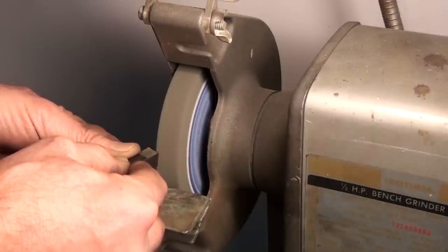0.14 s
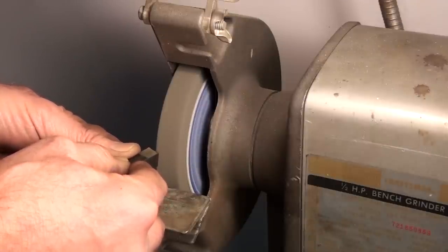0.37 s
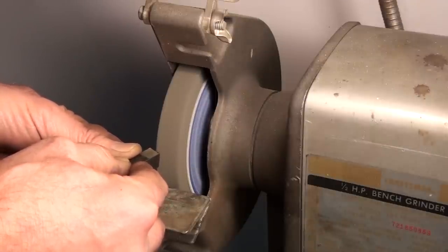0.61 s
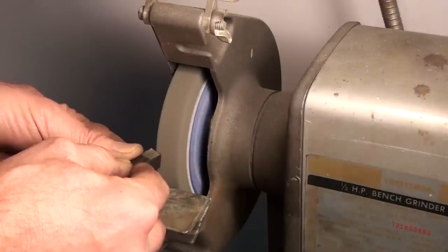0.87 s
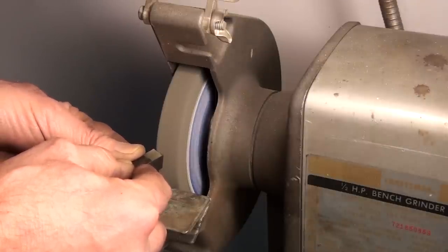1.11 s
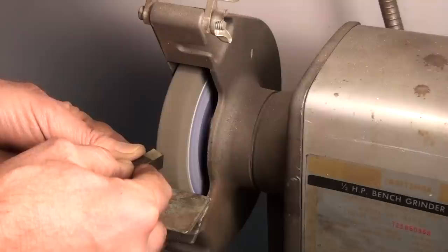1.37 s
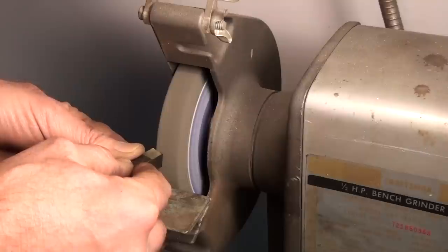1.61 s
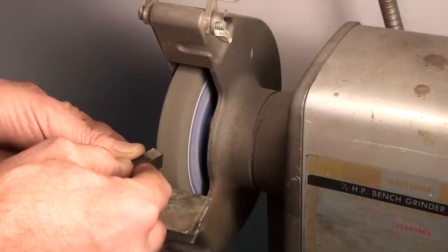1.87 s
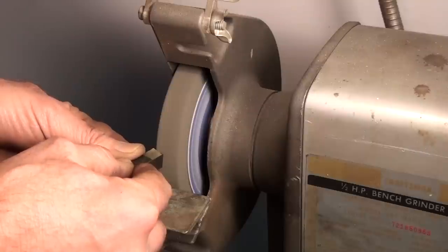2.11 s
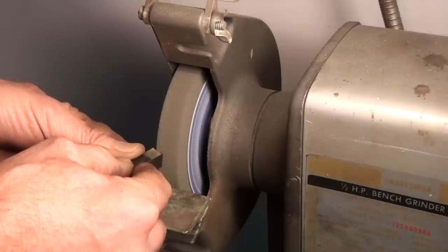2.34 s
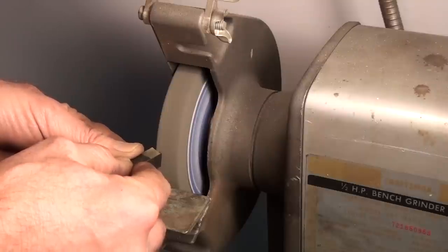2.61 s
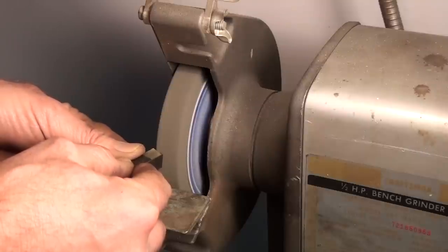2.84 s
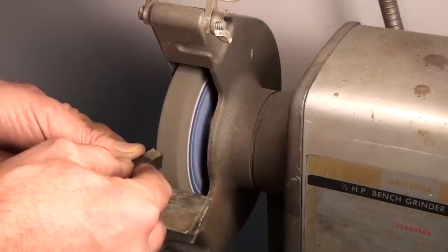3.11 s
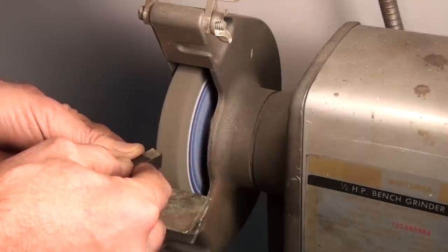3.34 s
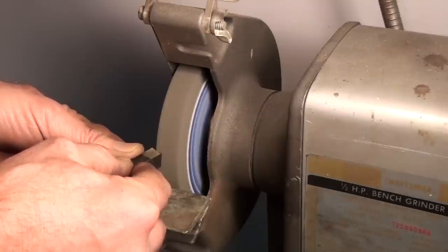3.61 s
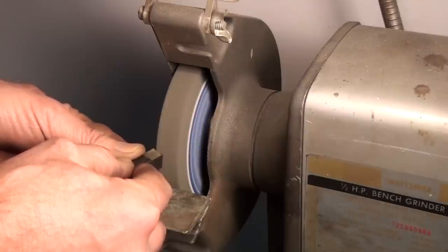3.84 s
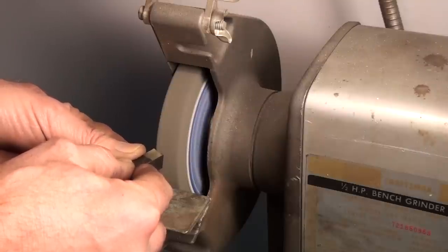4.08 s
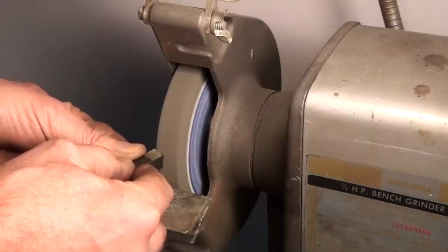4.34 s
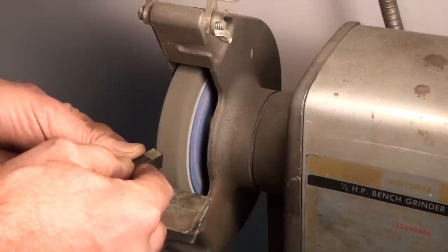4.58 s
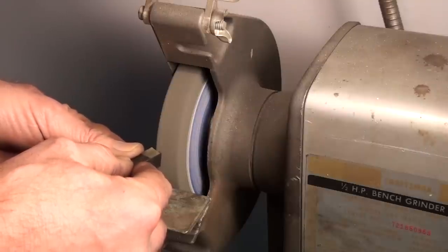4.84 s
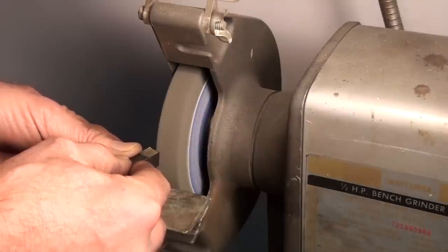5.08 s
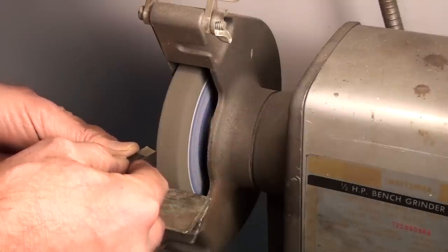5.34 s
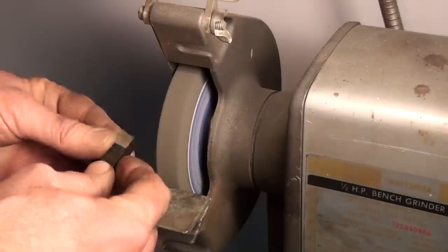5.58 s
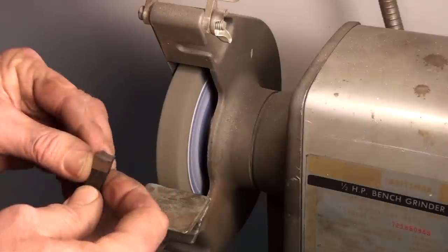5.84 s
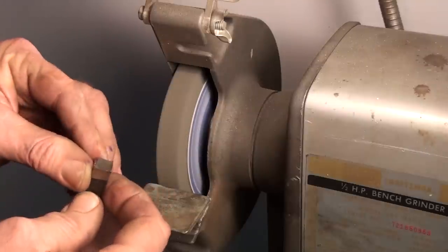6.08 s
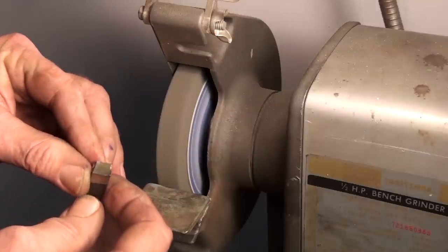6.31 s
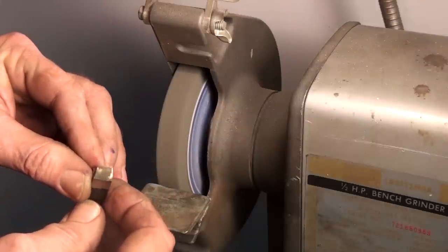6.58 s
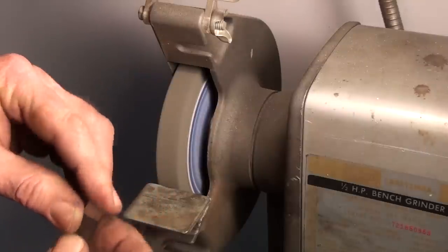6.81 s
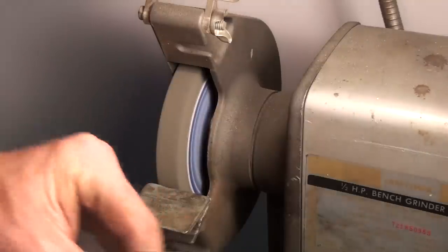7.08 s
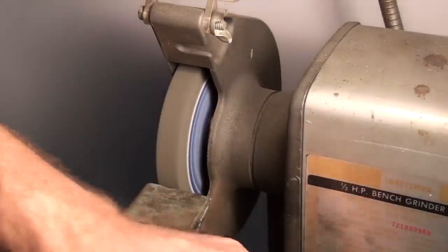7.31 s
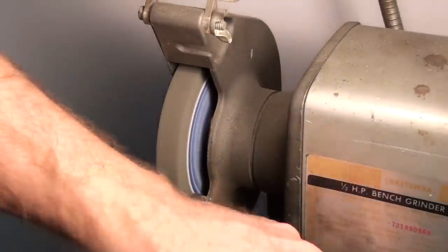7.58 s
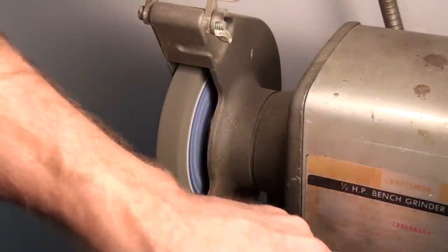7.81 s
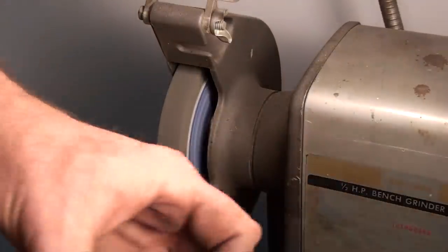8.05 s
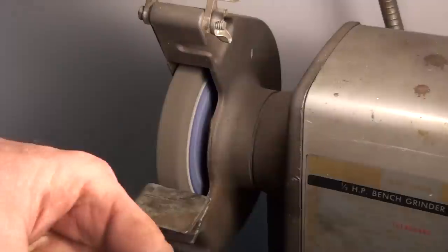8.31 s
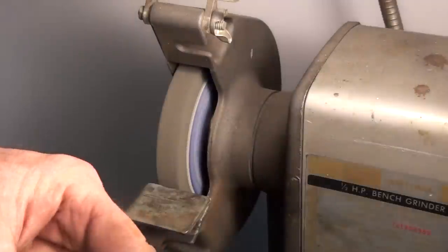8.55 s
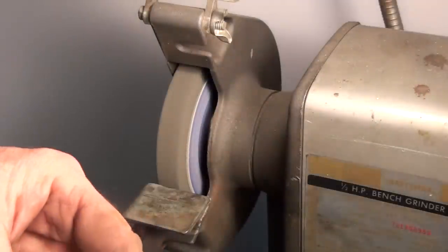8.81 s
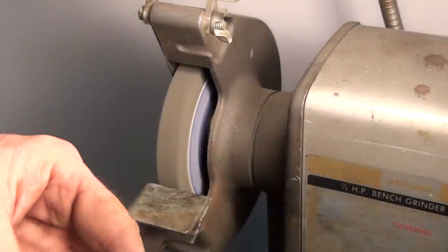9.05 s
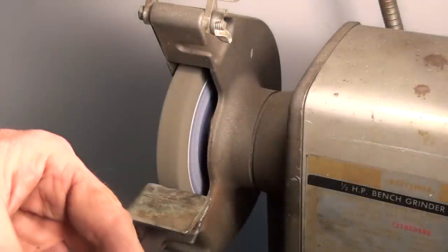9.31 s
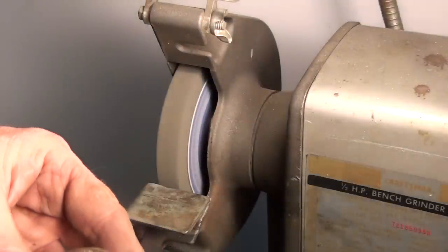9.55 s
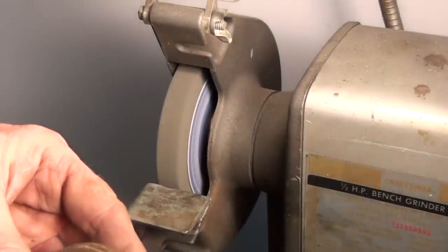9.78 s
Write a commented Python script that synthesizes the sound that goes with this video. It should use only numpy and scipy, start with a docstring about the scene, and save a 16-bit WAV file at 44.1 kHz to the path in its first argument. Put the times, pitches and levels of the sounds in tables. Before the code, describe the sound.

Scratchy, ringing metal grinding with spark hiss over a constant beating motor whine, then only the running machine remains in the workshop.

```python
"""In a workshop a bench grinder runs steadily: mains hum, the beating whine of two ball bearings, air roar.
A hand-held steel tool bit is pressed on the wheel in uneven strokes, then lifted away. Dense grain strikes
excite resonances of bit and tool rest, with spark hiss; sparse noise bursts are catching grains. The whine
is a sum of sines at ball-pass multiples, the roar is band-filtered noise; both follow the worker's pose,
and an arm reaching past the machine shades the whine."""
import sys
import numpy as np
from scipy import signal
from scipy.fft import rfft, irfft
from scipy.io import wavfile
from scipy.ndimage import uniform_filter1d

SR = 44100
rng = np.random.default_rng(int(sys.argv[2]) if len(sys.argv) > 2 else 0)


def master(y):
    """Save y as 16-bit WAV."""
    cut = np.clip(np.atleast_2d(y).T, -1, 1)
    pcm = np.round(cut * 32767)  # scale
    wavfile.write(sys.argv[1], SR, pcm.astype(np.int16))


def nominal_scale(level):
    """Amplitude ratio for a level in decibels (scalar or array-like)."""
    x = np.asarray(level, float) / 20
    return 10 ** x


N = 437472
SHAFT_HZ = 59.66

# Steady contact of tool and wheel: t/s, tool rest level/dB rms, mean spark hiss level/dB rms
CONTACT = [(0.0, -36, -31), (0.5, -35, -30), (0.78, -32, -35), (1.12, -55, -48), (1.45, -33, -41),
           (2.08, -34, -38), (2.3, -25, -40), (2.5, -24, -38), (2.86, -31, -37), (3.2, -27.5, -35),
           (3.5, -29, -37), (3.72, -32, -30), (3.95, -23, -35), (4.17, -32, -36), (4.68, -27, -37),
           (5.1, -31.5, -35), (5.4, -32, -27), (5.6, -48, -43), (5.83, -76, -71)]


def grinding(phase_per_hz):
    """Impact excitation: one train of grain strikes drives both the steel and the sparks."""
    rest_db, hiss_db = in_time(CONTACT)
    shank, tip, rest, biting = bites()
    grit = grain_strikes(phase_per_hz)
    hiss_swing = np.minimum(biting, 1) - 0.5
    return steel(grit, rest_db, shank, tip, rest) + sparks(grit, phase_per_hz, hiss_db, hiss_swing)


def grain_strikes(phase_per_hz):
    """Random impulse train, amplitude-modulated by wheel runout (once and twice a turn) and a shaky hand."""
    strikes_per_s = 6000
    runout = 1 + 0.18 * np.cos(SHAFT_HZ * phase_per_hz) + 0.23 * np.cos(2 * SHAFT_HZ * phase_per_hz)
    bite = nominal_scale(1.3 * drift(25.0)) * runout
    sizes = nominal_scale(5.0 * np.minimum(rng.exponential(1, (2, N)), 5))
    signs = rng.choice([-1, 1], (2, N))
    struck = rng.random((2, N)) < strikes_per_s / SR
    return bite * sizes * signs * struck + 1e-18


# Resonances of tool rest, bit shank and bit tip: f/Hz, width/Hz, relative level/dB
REST_MODES = [(529, 18, -11.5), (728.4, 18.5, 1.5), (747, 29, -2), (801, 20.5, 0), (822, 28, -5.5),
              (871, 25, -2), (966, 20, -10), (1285, 58, -9.5), (1500, 31, -13.5), (1960, 77, -12)]
SHANK_MODES = [(4500, 60, -15), (4576, 32, 0), (4690, 50, -14), (4778, 45, -9), (4860, 70, -15)]
TIP_MODES = [(9628, 36, -6), (9972, 26, 0), (10190, 120, -15), (14980, 50, -22), (15590, 50, -22)]


def steel(grit, rest_db, shank, tip, rest):
    """Modal resonance: bite powers add to the steady ringing power of each part."""
    shank_under_rest_db, tip_under_rest_db = -1, -10.5   # steady ringing between bites
    parts = [(REST_MODES, rest, 0), (SHANK_MODES, shank, shank_under_rest_db),
             (TIP_MODES, tip, tip_under_rest_db)]
    out = 0
    for modes, bite_power, under_rest_db in parts:
        height = np.sqrt(bite_power + nominal_scale(2 * (rest_db + under_rest_db)))
        out = out + height * evened(ringing(grit, modes), share=0.51)
    return out


# Broad hiss resonances: f/Hz, width/Hz, relative level/dB
HISS_MODES = [(6720, 90, 8), (7220, 270, 2), (8200, 310, 3), (10300, 2000, -4)]


def sparks(grit, phase_per_hz, hiss_db, hiss_swing):
    """Periodic modulation: sparks fly most once a turn, under the wheel's high spot, and swell with bites."""
    swell_db = 3.5
    once_a_turn = np.exp(1.4 * (np.cos(SHAFT_HZ * phase_per_hz) - 1))
    high_spot = 1.5 + once_a_turn * nominal_scale(3.0 * drift(25.0))
    return nominal_scale(hiss_db + swell_db * hiss_swing) * ringing(grit * high_spot, HISS_MODES)


# The hand jerks the tool into the wheel: centre t/s, length/s between the 1/e points of power,
# then shank, tip and tool rest level/dB rms, added in power to the steady contact
BITES = [(0.042, 0.082, -38, -30.0, -33), (0.2, 0.035, -28.0, -34.0, -43.0), (0.26, 0.034, -24, -41, -35.0),
         (0.345, 0.029, -25, -34.0, -35), (0.493, 0.037, -26, -34, -34.0), (0.546, 0.042, -31.0, -31, -33),
         (0.63, 0.04, -36, -39, -28), (0.748, 0.045, -36.0, -38.0, -28), (1.357, 0.03, -28.0, -35.0, -36),
         (1.426, 0.033, -24, -28, -31.0), (1.585, 0.035, -21.5, -27, -25),
         (1.641, 0.029, -26.0, -26, -36.0), (1.758, 0.035, -23, -35.0, -28), (1.902, 0.05, -23, -29, -30),
         (1.967, 0.044, -22, -33, -29), (2.137, 0.038, -20, -36.0, -24), (2.226, 0.059, -20, -32, -25),
         (2.303, 0.04, -23.0, -37, -22), (2.355, 0.057, -22, -36, -26.0), (2.43, 0.038, -22, -39, -33),
         (2.534, 0.025, -21, -37, -25.0), (2.6, 0.067, -27, -26, -25), (2.64, 0.054, -22, -35, -28.0),
         (2.7, 0.027, -34, -32.0, -37), (2.79, 0.051, -21.5, -36.0, -25), (2.942, 0.064, -22, -32.0, -24),
         (3.044, 0.05, -24.0, -39, -29.0), (3.101, 0.029, -21, -35, -36), (3.18, 0.055, -22, -30.0, -22.5),
         (3.244, 0.043, -21.0, -37, -25), (3.317, 0.05, -24, -27, -27), (3.375, 0.038, -27, -36, -26.0),
         (3.424, 0.039, -22, -32.0, -31), (3.463, 0.053, -28, -31.0, -33), (3.505, 0.073, -26, -33.0, -23),
         (3.577, 0.029, -22, -25, -30), (3.651, 0.031, -34, -29, -36), (3.718, 0.027, -30.0, -27, -32),
         (3.887, 0.06, -20, -28.0, -26), (3.964, 0.04, -18.5, -31.0, -32),
         (4.064, 0.061, -17.5, -29.0, -30), (4.172, 0.044, -22, -30.0, -31.0),
         (4.273, 0.052, -20.0, -39, -22.5), (4.324, 0.066, -28, -31, -27), (4.373, 0.033, -24, -36, -23),
         (4.422, 0.027, -31, -31.0, -39), (4.48, 0.052, -25.0, -29, -26), (4.562, 0.035, -22, -29.0, -30.0),
         (4.606, 0.052, -23.0, -35, -25.0), (4.688, 0.061, -20.0, -39, -22), (4.77, 0.037, -25.0, -35, -22),
         (4.81, 0.032, -23, -37, -33), (4.88, 0.045, -23, -32.0, -38), (4.95, 0.04, -31.0, -31, -28.0),
         (5.02, 0.035, -33, -34.0, -39), (5.07, 0.04, -37, -32.0, -32.0), (5.12, 0.032, -31, -34, -29.0)]


def bites():
    """Energy envelopes: bell-shaped power of shank, tip and rest, and the bare bell of every bite."""
    out, clock = np.zeros((4, N)), np.arange(N) / SR
    for centre, length, *levels_db in BITES:
        near = slice(max(int((centre - 2 * length) * SR), 0), int((centre + 2 * length) * SR))
        bell = np.exp(-np.abs(2 * (clock[near] - centre) / length) ** 2.8)
        powers = nominal_scale(2 * np.array(levels_db + [0]))
        out[:, near] += bell * powers[:, None]
    return out


def evened(x, share):
    """Envelope levelling: quick swells and gaps of the ringing are partly levelled; rms 1."""
    power = uniform_filter1d(np.mean(x ** 2, axis=0), size=700)
    slow = uniform_filter1d(power, size=8000)
    levelling = (slow + 1e-9) / (power + 0.1 * slow + 1e-9)
    return rms_one(x * levelling ** (np.clip(share, 0, 1) / 2))


# Proud grains catching the tool edge: t/s, relative level/dB
SNAGS = [(0.0343, -10), (0.1535, -13), (0.2094, -11), (0.3022, -13), (0.4194, -14), (0.4694, -14),
         (0.5033, -6), (0.5372, -3), (0.6194, -18), (0.6994, -14), (1.87, -5), (5.239, -8), (5.2794, -7),
         (5.2964, -8), (5.3794, -11), (5.4294, -7)]


def snags():
    """Transient excitation: noise scratches, decaying over two milliseconds, ring the tool's bright modes."""
    burst = np.zeros((2, N))
    fade = np.exp(-np.arange(400) / (0.002 * SR))
    for s, level_db in SNAGS:
        at = round(s * SR)
        burst[:, at:at + 400] += nominal_scale(level_db) * fade * rng.standard_normal((2, 400))
    burst_rms = np.sqrt(np.mean(burst ** 2))
    return ringing(burst + 1e-18, HISS_MODES) * burst_rms * nominal_scale(-8.5)


def ringing(grit, modes):
    """Parallel resonators: each mode is a two-pole filter with alternating sign; the sum has rms 1."""
    out = 0
    for k, (hz, width_hz, level_db) in enumerate(modes):
        r = np.exp(-np.pi * width_hz / SR)
        poles = [1, -2 * r * np.cos(2 * np.pi * hz / SR), r * r]
        mid, side = signal.lfilter([1, 0, -1], poles, grit)
        gain = (-1) ** k * nominal_scale(level_db) * (1 - r * r) / 2
        out = out + gain * spread(mid, side, hz)
    return rms_one(out)


# Balls over the outer race of near and far bearing: f/Hz
BALL_PASS_HZ = (181.55, 181.881)
# Bearing lines: multiple of ball pass, shaft turns added, near and far bearing level/dB rms
# (levels here and in CASING_TONES are before pose and stereo lean)
BALL_LINES = [(1, 0, -55.5, -70.0), (3, 0, -70.0, -46.2), (4, 0, -55.6, -55.6), (4, 1, -51.3, -70.0),
              (5, 0, -31.4, -70.0), (6, 0, -70.0, -49.5), (7, 0, -70.0, -45.5), (7, 1, -70.0, -49.4),
              (8, -1, -70.0, -52.7), (8, 0, -38.3, -70.0), (9, -1, -42.0, -70.0), (9, 0, -44.4, -46.9),
              (9, 1, -47.4, -70.0), (10, 0, -30.2, -32.1), (10, 1, -70.0, -48.4), (11, -1, -47.0, -70.0),
              (11, 0, -37.8, -38.6), (11, 1, -47.3, -49.1), (11, 2, -70.0, -48.3), (12, 0, -45.6, -47.2),
              (12, 1, -70.0, -43.9), (12, 2, -50.6, -70.0), (13, 0, -50.8, -49.4), (13, 1, -54.0, -52.0),
              (14, 0, -70.0, -52.7), (15, -1, -57.1, -54.7), (15, 0, -57.2, -53.4), (16, 0, -55.3, -70.0),
              (18, 0, -54.0, -70.0), (19, -1, -70.0, -53.8), (19, 0, -70.0, -54.1), (19, 1, -70.0, -52.8),
              (20, 0, -70.0, -47.0), (21, -1, -70.0, -55.4), (21, 0, -53.1, -53.0), (22, -1, -70.0, -44.2),
              (22, 0, -70.0, -49.2), (23, -1, -70.0, -46.3), (23, 0, -46.4, -28.6), (23, 1, -70.0, -41.0),
              (24, -1, -70.0, -47.5), (24, 0, -43.2, -35.1), (24, 1, -70.0, -42.4), (25, 0, -45.8, -42.5),
              (26, -1, -70.0, -46.1), (26, 0, -70.0, -47.7), (27, -1, -70.0, -49.4), (27, 1, -70.0, -47.2),
              (30, 0, -70.0, -51.9), (30, 1, -53.9, -54.5), (31, 1, -70.0, -53.7), (32, 0, -70.0, -48.5),
              (34, 0, -70.0, -48.4), (34, 1, -70.0, -54.2), (35, -1, -70.0, -51.1), (35, 0, -70.0, -49.0),
              (36, -1, -70.0, -57.2), (40, -1, -70.0, -52.8)]
# Further steady tones of cage and casing: f/Hz, level/dB rms
CASING_TONES = [(298.8, -51.2), (417.5, -50.1), (591.8, -55.8), (597.0, -49.8), (657.1, -54.7),
                (663.1, -48.5), (685.7, -54.7), (776.5, -50.4), (954.9, -40.8), (1014.8, -45.8),
                (1074.1, -47.0), (1193.7, -53.7), (1293.7, -51.1), (1312.5, -51.6), (1432.4, -46.3),
                (1492.2, -49.6), (1611.2, -41.9), (1656.8, -44.9), (1671.2, -53.8), (1790.1, -42.4),
                (1805.1, -52.3), (1838.1, -46.6), (1851.2, -52.1), (1969.6, -54.1), (1974.2, -48.8),
                (2201.2, -46.3), (2269.3, -49.2), (2285.2, -48.9), (2519.4, -57.3), (2564.8, -55.2),
                (3043.9, -58.7), (3245.8, -57.3), (3282.8, -57.1), (3405.6, -56.8), (3609.5, -52.7),
                (3633.8, -50.8), (3654.3, -54.6), (3790.5, -55.5), (4017.6, -53.9), (4064.4, -46.7),
                (4091.0, -51.4), (4198.6, -49.5), (4221.2, -47.6), (4318.5, -48.3), (4562.0, -50.3),
                (4592.6, -50.5), (4776.7, -47.3), (4821.8, -50.9), (5005.1, -50.1), (5051.2, -50.8),
                (5278.7, -51.6), (5462.4, -52.4), (5691.2, -56.7), (5735.9, -54.2), (5758.8, -56.2),
                (5841.2, -55.8), (5966.4, -56.1), (7058.8, -50.9), (7288.5, -52.0), (7748.3, -54.2),
                (10182.2, -56.3)]
# Slow shift in beat timing: the far bearing's phase lags, then returns: t/s, phase per multiple/rad
BEAT_SHIFT = [(0.0, 0), (1.5, -.01), (3, -.035), (5, -.07), (7, -.035), (9.92, 0)]
# Quick flutter of the high whine: f/Hz, depth 0-1
FLUTTER = [(18.1, 0.08), (22.7, 0.05), (40.3, 0.11)]
# Centres of the whine groups: f/Hz
GROUP_HZ = (908, 1560, 1817, 1999, 4183, 4365, 6184)
# Shift of each group: level/dB, change/dB for hands off, arm across, weight on bench
WHINE_SHIFT = [(0.5, 0.3, 0.3, 1), (1.7, 0.2, -1.5, -10), (1.5, 0, -3, 0.5), (0.36, 2.1, -0.5, 1.3),
               (2.5, -1.5, -4.5, 0.5), (2.5, -1.1, 0, 0.8), (3, -0.2, 0.1, 0.5)]


def whine(phase_per_hz):
    """Beating: ball-pass multiples with shaft sidebands; equal multiples of two bearings interfere."""
    bearing_lag_rad, housing_lag_rad = -1.7, -1.75   # far against near: per multiple, overall
    groups = np.zeros((len(GROUP_HZ), 2, N), np.float32)
    beat_shift, = in_time(BEAT_SHIFT)

    def nearest(hz):
        return np.argmin(np.abs(np.log(hz / np.array(GROUP_HZ))))

    for multiple, side, *levels_db in BALL_LINES:
        start = rng.uniform(0, 2 * np.pi)
        for far, (rate, level_db) in enumerate(zip(BALL_PASS_HZ, levels_db)):
            hz = multiple * rate + side * SHAFT_HZ
            lag = far * (multiple * (bearing_lag_rad + beat_shift) + housing_lag_rad)
            waver_db = 0.6 if level_db > -40 else 2.5   # weak lines come and go
            if level_db > -66:   # weaker lines are silent
                groups[nearest(hz)] += tone(hz * phase_per_hz + start + lag, hz, level_db, waver_db)
    for hz, level_db in CASING_TONES:
        start = rng.uniform(0, 2 * np.pi)
        groups[nearest(hz)] += tone(hz * phase_per_hz + start, hz, level_db, waver_db=2.5)
    flutter = sum(depth * np.cos(hz * phase_per_hz + rng.uniform(0, 2 * np.pi)) for hz, depth in FLUTTER)
    groups[4:] *= 1 + flutter
    return sum(nominal_scale(posed(shift)) * group for group, shift in zip(groups, WHINE_SHIFT))


# Shaft and magnetic hum: f/Hz, level/dB rms
HUM = [(59.66, -65.5), (120, -43.5)]
# Buzz: level/dB rms, change/dB for hands off, arm across, weight on bench
BUZZ_SHIFT = (-46, 2.5, -1.5, 7.5)


def hum():
    """Magnetic forcing at the mains octave, plus a shaft tone; the next octave buzzes in the loaded bench."""
    buzz_hz = 240
    clock = 2 * np.pi * np.arange(N) / SR
    steady = sum(tone(hz * clock, hz, level_db, waver_db=2.0) for hz, level_db in HUM)
    return steady + tone(buzz_hz * clock, buzz_hz, posed(BUZZ_SHIFT), waver_db=0.6)


# Air and rolling roar before guard, pose and stereo lean: f/Hz, density level/dB per Hz
ROAR = [(35, -84.5), (100, -72), (200, -67), (300, -62.5), (650, -62), (940, -57.5), (1200, -60),
        (2200, -60.5), (3050, -68), (4400, -58.5), (5700, -65), (9200, -63.5), (13000, -72), (15700, -74.5)]
# The wheel guard colours the roar: f/Hz, width/Hz, peak level/dB
GUARD = [(657, 69, -4.5), (1206, 36, -11), (1284, 49, 6.5), (6200, 100, 2), (7100, 280, 2),
         (7820, 210, -4.5)]
# Bands that the body shades or mirrors: f/Hz, level/dB, change/dB for hands off, arm across, weight on bench
ROAR_SHIFT = [(850, 0.4, -0.3, 0.3, 0), (1200, 0.3, 0, -1, -0.6), (1700, 0.6, -1, 0.3, -2),
              (2400, 0, -2.2, -0.7, 1), (3400, -0.3, -0.6, 1, 0.4)]


def roar(phase_per_hz):
    """Broadband flow noise: bands flicker, half an octave wide from 250 Hz; upper ones throb with the machine."""
    hz = np.maximum(np.fft.rfftfreq(N, 1 / SR), 10)
    guard_db = sum(db / (1 + (2 * (hz - centre) / width) ** 2) for centre, width, db in GUARD)
    white = rfft(rng.standard_normal((2, N)))
    coloured = white * nominal_scale(at_hz(ROAR, hz) + guard_db) * np.sqrt(SR / 2)
    throb = 0.016 * np.cos(SHAFT_HZ * phase_per_hz) + 0.037 * np.cos(BALL_PASS_HZ[1] * phase_per_hz)
    out, together = 0, drift(11.0)
    edges = np.r_[0, 62.5, 125, 250 * 2 ** np.arange(0, 6.6, 0.5)]
    for low, high in zip(edges, edges[1:]):
        mid, side = irfft(coloured * ((hz >= low) & (hz < high)), N)
        flicker_db = 0.4 * together + 0.5 * drift(15.0)
        gain = nominal_scale(flicker_db) * (1 + throb * (low > 2500))
        for band_hz, *shift in ROAR_SHIFT:
            if low < band_hz < high:
                gain = gain * nominal_scale(posed(shift))
        out = out + gain * spread(mid, side, (low + high) / 2)
    return out


# Where the worker is: t/s, hands off the wheel 0-1, arm across the machine 0-1, weight on the bench 0-1
POSE = [(0.0, 0.06, 0, 0.08), (5.4, 0, 0, 0.06), (6.1, 1, 0.2, 0), (6.7, 0.6, 0.04, 0), (7.2, 1, 1, .03),
        (7.7, 1, 1, 0), (7.95, 0.8, 0.7, 0.6), (8.7, 1, 0.55, 1), (9.3, 1, 0.2, 0.87), (9.92, 0.9, .1, 0.7)]


def posed(shift):
    """Shading and loading by the body: a level in dB that follows the worker's pose."""
    level_db, *changes_db = shift
    return level_db + sum(change_db * share for change_db, share in zip(changes_db, in_time(POSE)))


# Left-right likeness left by the room: f/Hz, likeness 0-1
LIKENESS = [(60, 0.93), (100, 1), (180, 0.99), (310, 0.97), (550, 0.92), (950, 0.92), (1650, 0.92),
            (2860, 0.69), (4970, 0.94), (8640, 0.66), (15000, 0.86)]


def likeness(hz):
    """Interaural coherence at a frequency, 0-1."""
    return np.clip(at_hz(LIKENESS, hz), 0, 1)


def spread(mid, side, hz):
    """Partial coherence: left and right from two unrelated signals, as alike as the room leaves them."""
    alike = likeness(hz)
    return np.sqrt((1 + alike) / 2) * mid + np.sqrt((1 - alike) / 2) * side * [[1], [-1]]


def tone(phase, hz, level_db, waver_db):
    """Phase difference by reflection: a wavering sine, its phase skewed between the two sides."""
    skew = rng.normal(0, 1) * np.sqrt(1 - likeness(hz)) * 0.82
    waver = np.repeat(nominal_scale(waver_db * slow_chance(1.5)), 100)[:N]
    height = (np.sqrt(2) * nominal_scale(level_db) * waver).astype(np.float32)
    return height * np.sin((phase + [[skew], [-skew]]).astype(np.float32))


def slow_chance(rate_hz):
    """Low-passed noise: two one-pole stages, rms 1, one value per 100 samples."""
    r = np.exp(-2 * np.pi * rate_hz * 100 / SR)
    noise = rng.standard_normal(N // 100 + 3002)
    slow = signal.lfilter([1], [1, -2 * r, r * r], noise)[3000:]   # settled part
    return rms_one(slow - slow.mean())


def drift(rate_hz):
    """Linear interpolation: slow chance, sample by sample."""
    slow = slow_chance(rate_hz)
    return np.interp(np.arange(N) / 100, np.arange(len(slow)), slow)


def in_time(rows):
    """Linear interpolation: columns of a curve table, sample by sample."""
    s, *columns = np.transpose(rows)
    return [np.interp(np.arange(N) / SR, s, column) for column in columns]


def at_hz(points, hz):
    """Logarithmic frequency scale: value of a spectrum table at hz."""
    table_hz, values = np.transpose(points)
    return np.interp(np.log(hz), np.log(table_hz), values)


def rms_one(x):
    """Energy normalisation: scale to rms 1."""
    return x / np.sqrt(np.mean(x ** 2) + 1e-20)


# Left-right balance of all but the hum: f/Hz, level/dB
LEAN = [(60, 3), (100, 2.5), (180, 1), (310, -0.5), (550, 0), (950, -1), (1650, -2.5), (2860, -3.5),
        (4970, -2), (8640, -3.5), (15000, 0.5)]
# Further balance above the bass: level/dB, change/dB for hands off, arm across, weight on bench
LEAN_SHIFT = (-0.45, -0.6, -0.1, -0.2)


def leaned(x):
    """Level difference between ears: the treble mostly leans right, more so once the hands move off."""
    sides = np.array([[1], [-1]])
    hz = np.maximum(np.fft.rfftfreq(N, 1 / SR), 10)
    moving = irfft(rfft(x) * (hz > 500), N)   # the bass keeps its place
    x = x + moving * (nominal_scale(posed(LEAN_SHIFT) / 2 * sides) - 1)
    return irfft(rfft(x) * nominal_scale(at_hz(LEAN, hz) / 2 * sides), N)


def scene():
    """Superposition: grinding, whine and roar share one slightly wandering speed; snags and hum are added."""
    phase_per_hz = 2 * np.pi * np.cumsum(1 + 0.0002 * drift(0.5)) / SR   # rad per Hz
    upper = grinding(phase_per_hz) + snags() + whine(phase_per_hz) + roar(phase_per_hz)
    return leaned(upper) + hum()


def top_cut(x):
    """Nothing passes above the cut-off."""
    return signal.sosfilt(signal.butter(12, 15990, fs=SR, output="sos"), x)


def record(dry):
    """Band limitation: a steep Chebyshev low-pass cuts the top."""
    low_pass = signal.cheby2(14, 60, 15950, fs=SR, output="sos")
    cut = signal.sosfilt(low_pass, dry)
    return top_cut(cut)


dry = scene()
out = record(dry)
master(out)
```